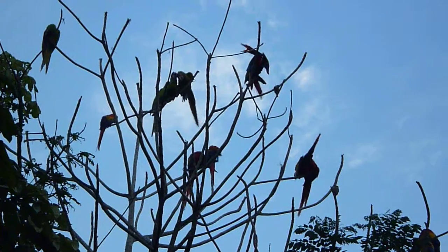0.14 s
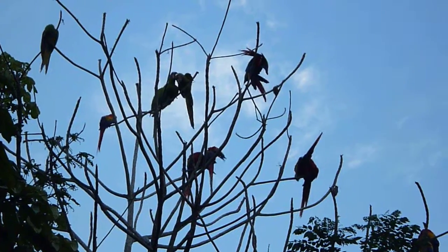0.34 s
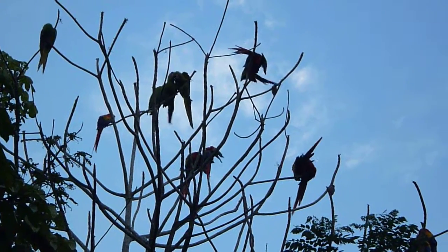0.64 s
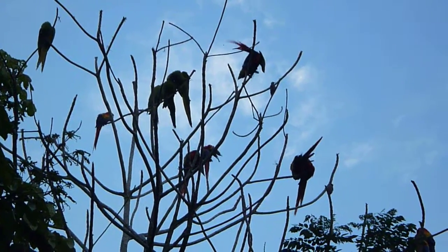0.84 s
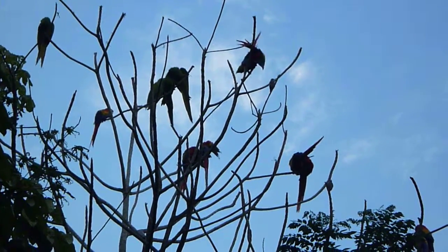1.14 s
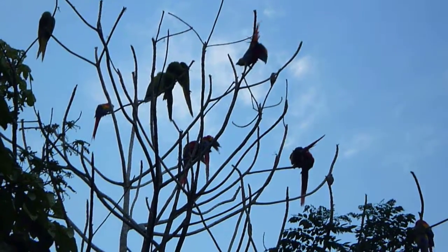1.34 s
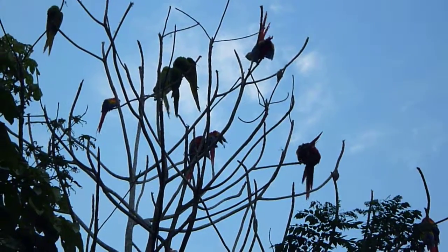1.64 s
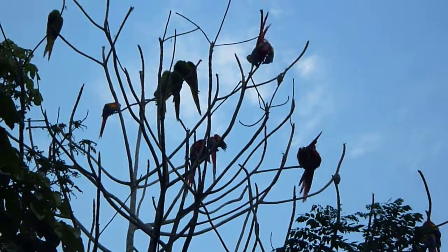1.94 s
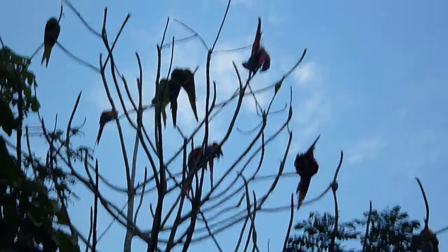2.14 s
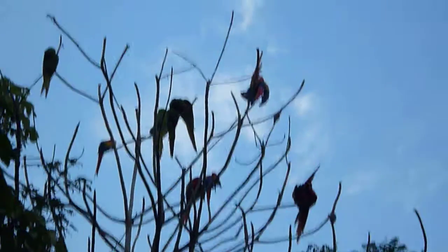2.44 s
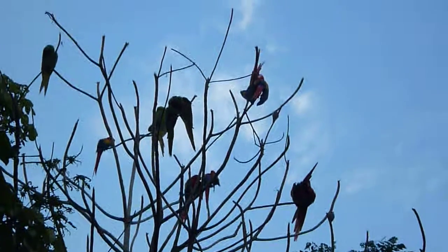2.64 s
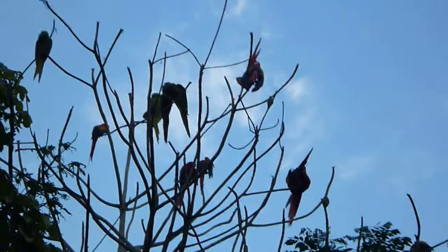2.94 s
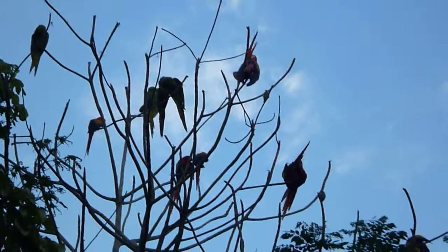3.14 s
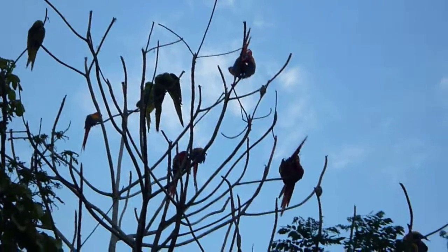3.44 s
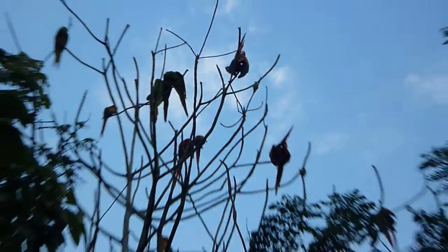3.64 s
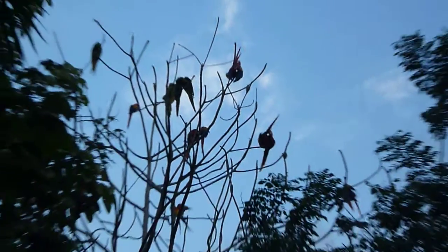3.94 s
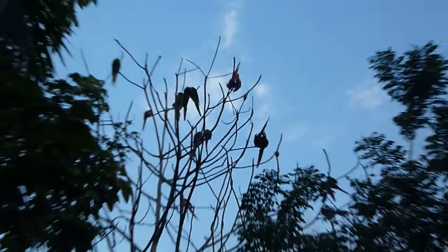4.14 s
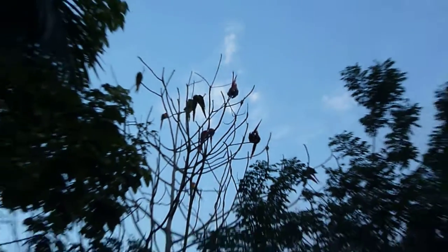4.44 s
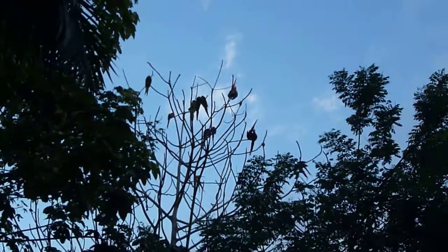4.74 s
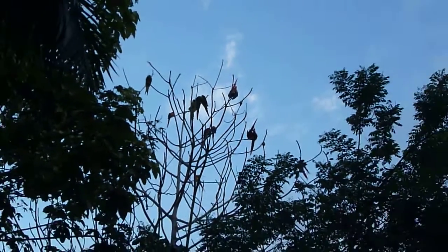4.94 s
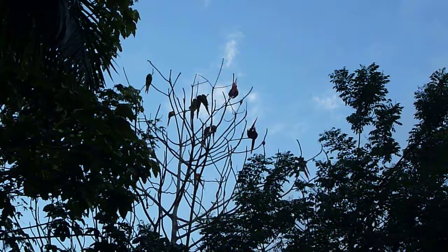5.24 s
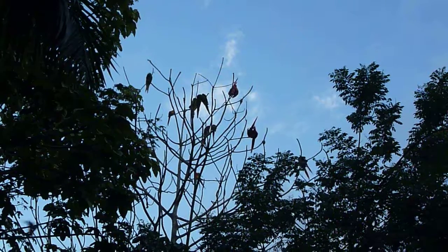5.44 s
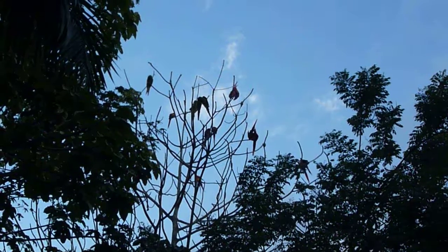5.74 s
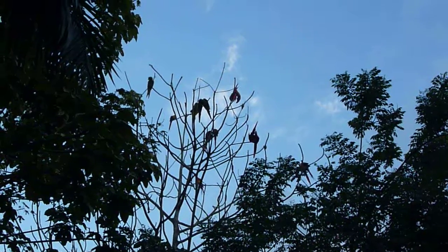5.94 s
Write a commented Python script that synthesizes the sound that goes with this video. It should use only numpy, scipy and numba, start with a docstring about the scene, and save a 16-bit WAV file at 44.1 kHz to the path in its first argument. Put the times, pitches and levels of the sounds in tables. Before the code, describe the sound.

Large parrots squawk harshly in forest trees, with whistles, chirps, faint insects and a few close camera creaks.

```python
"""A harsh macaw squawk opens the scene, and more follow from a bare tree at the edge of a forest.
Each is a rough buzz from the syrinx, shaped by throat, tongue and beak. Whistles and chirps slip in
between, and the trees echo the calls over a shimmer of insects and a soft rush of air. Up close, a
hand-held camera is bumped and rubbed, its zoom motor whines for a second, and its plastic shell
creaks, loudest near the end."""
import sys
import numpy as np
from scipy import signal
from scipy.fft import rfft, irfft
from scipy.io import wavfile
from scipy.ndimage import uniform_filter1d
from numba import njit

SR = 44100
rng = np.random.default_rng(int(sys.argv[2]) if len(sys.argv) > 2 else 0)


def store_pcm(level_fs):
    """Save levels as 16-bit WAV."""
    pcm = np.round(np.clip(level_fs, -1, 1) * 32767).astype(np.int16)
    wavfile.write(sys.argv[1], SR, np.atleast_2d(pcm).T)


N = 268128
TIME = np.arange(N) / SR

# Throat and beak resonances, by tone of voice. Each row: centre in Hz, width in Hz, gain in dB.
THROAT_FORMANTS = {"bright": [(1410, 320, 0.5), (2060, 470, -1.5), (2590, 370, -2), (3050, 350, -2),
                   (4100, 860, -5.5)], "hollow": [(1150, 240, -5), (1790, 350, -4), (2440, 450, -5.5),
                   (3170, 450, -4), (4350, 820, -5.5)], "shrill": [(1250, 510, -4.5), (1830, 400, -2),
                   (2310, 240, -1), (2980, 340, -1), (4330, 2100, -9.5)], "nasal": [(1010, 300, -8.5),
                   (1490, 400, -5.5), (1929, 570, -1.5), (2890, 470, -3.5), (4330, 330, -3)],
                   "deep": [(1180, 300, -2.5), (1710, 380, -2.5), (2760, 730, -3), (3580, 430, -2.5),
                   (4160, 680, -4.5)]}
# The macaws' calls. Each row: tone of voice, start and let-go in seconds, attack and release in seconds,
# relative level in dB, pitch in Hz, sag at let-go as a share of pitch, roughness from 0 to 1,
# first and last tongue resonance in Hz, treble share with the beak open in dB.
MACAW_CALLS = [("bright", 0.22, 0.46, 0.18, 0.082, -41, 377, 0, 0.6, 1400, 2570, -1.5),
               ("hollow", 0.75, 1.05, 0.22, 0.072, -39.5, 378, 0.02, 0.55, 2160, 2050, -2.5),
               ("hollow", 1.09, 1.225, 0.06, 0.032, -46.5, 385, 0.06, 0.2, 1800, 1800, -3.5),
               ("shrill", 2.06, 2.335, 0.05, 0.063, -38, 485, 0.12, 0.483, 2600, 2000, -1.6),
               ("shrill", 2.33, 2.55, 0.0697, 0.057, -44.5, 405, 0.0404, 0.85, 1540, 1620, -3.5),
               ("hollow", 2.7, 2.93, 0.101, 0.07, -54.5, 350, 0.04, 0.704, 1100, 1200, -10),
               ("nasal", 4.08, 4.195, 0.0906, 0.055, -44.5, 488, 0.03, 0.22, 1550, 1700, -1.1),
               ("deep", 4.72, 4.8, 0.04, 0.09, -54, 370, 0.032, 0.7, 1900, 2200, -10),
               ("deep", 5.07, 5.26, 0.12, 0.23, -44.5, 361, 0.003, 0.505, 1640, 1700, -2.8),
               ("deep", 5.38, 5.62, 0.16, 0.1, -37, 337, 0.04, 0.835, 1600, 2040, -2.5)]
def squawks(scoop=.04, sag_curve=3, edge_roughness=.95, beak_shut_db=-8):
    """The beak opens and the voice rises and firms up, then sags and turns rough as the bird lets go."""
    out = np.zeros(N)
    for tone, start, end, attack, release, db, hz, sag, rough, *tongue_ends, open_db in MACAW_CALLS:
        first = int(np.clip(start * SR, 0, N - SR))
        on = slice(first, first + SR)  # the second that holds the squawk
        age = np.maximum(TIME[on] - start, 0)
        opening = np.minimum(age / attack, 1)
        effort = opening * np.exp(-np.maximum(TIME[on] - end, 0) / release)
        spent = np.minimum(age / (end - start), 1.15)
        pitch = hz * (1 - scoop * (1 - opening) - sag * spent ** sag_curve)
        rasp = syrinx(pitch, rough * effort + edge_roughness * (1 - effort))
        tongue_hz = np.interp(TIME[on], [start, end + release], tongue_ends)
        treble_db = open_db + beak_shut_db * (1 - opening)
        out[on] += from_db(db) * effort * mouth(rasp, THROAT_FORMANTS[tone], tongue_hz, treble_db)
    return out


def syrinx(pitch, rough, jitter=.08, wobble=.028, turbulence=2.4, rasp_db=1.5, rasp_hz=110):
    """A buzz whose cycles turn uneven, then break up into chaos as its roughness grows."""
    n, rough = len(pitch), np.clip(rough, 0, 1)
    shake = jitter * wander(168.2, n) + wobble * wander(45.2, n)
    phase = phase_of(pitch * (1 + rough * shake))
    buzz = rms_one(sum(np.cos(k * phase) * 6 / max(k, 6) for k in range(2, 14)))
    chaos = rms_one(rng.standard_normal(n) * (1 + .092 * np.cos(phase)))
    flutter = from_db(rasp_db * np.sqrt(rough) * wander(rasp_hz, n))
    return (buzz + turbulence * rough ** 1.5 * chaos) * flutter


def mouth(rasp, formants, tongue_hz, treble_db, beak_hz=2700, tongue_width_hz=600):
    """The rasp rings in the throat, the tongue lifts a moving band, a wider beak lets out more treble."""
    rasp = rasp + moving_resonance(rasp, tongue_hz, tongue_width_hz)
    rasp = cut(cut(rasp, 750, "high", order=3), 4900, "low", order=3)
    voice = sum((-1) ** k * from_db(db) * resonate(rasp, hz, width)
                for k, (hz, width, db) in enumerate(formants))
    body = hold_level(cut(voice, beak_hz, "low", order=3))
    bite = hold_level(cut(voice, beak_hz, "high", order=3))
    treble = np.clip(from_db(treble_db), 0, .9)
    return np.sqrt(1 - treble ** 2) * body + treble * bite


# The curve of the loud, falling whistle. Each row: time in seconds, pitch in Hz, level in dB.
WHISTLE_CURVE = [(1.565, 2012, -51.5), (1.585, 2116, -42), (1.681, 2072, -39.5), (1.733, 1875, -31.5),
                 (1.763, 1545, -39), (1.775, 1620, -77)]
def whistle(second_db=-42, third_db=-28):
    """A bird slurs a nearly pure tone with two faint overtones."""
    times, hz, db = np.transpose(WHISTLE_CURVE)
    phase = phase_of(np.interp(TIME, times, hz) * (1 + .002 * wander(80)))
    tone = np.sin(phase) + from_db(second_db) * np.sin(2 * phase) + from_db(third_db) * np.sin(3 * phase)
    envelope = from_db(np.interp(TIME, times, db)) * gate(times[0], times[-1], .004, .004)
    return np.sqrt(2) * envelope * tone


# Small chirps around the tree, and clear overtones ringing out of the squawks. Each row: start and
# length in seconds, first and last pitch in Hz, level in dB, roughness (0 is pure, about 1 is hoarse).
CHIRPS_AND_OVERTONES = [(0.56, 0.042, 815, 813, -51.5, 0.1), (0.64, 0.057, 819, 802, -52.5, 0.2),
                        (0.983, 0.08, 2230, 1880, -46.5, 0.02), (1.18, 0.06, 1883, 1800, -52, 0.12),
                        (1.236, 0.28, 2595, 3210, -59, 0.1), (1.52, 0.28, 3560, 3565, -57, 0.91),
                        (1.56, 0.16, 1304, 1385, -52, 1.05), (1.948, 0.05, 2010, 1953, -50.5, 0.2),
                        (1.95, 0.14, 1447, 1567, -53, 0.57), (1.981, 0.055, 3420, 3200, -52, 0.5),
                        (2.33, 0.061, 1279, 1162, -49, 0.5), (3.01, 0.17, 3520, 2617, -58, 0.55),
                        (3.0, 0.26, 2230, 2080, -61.5, 0.12), (3.713, 0.076, 2240, 2470, -61.5, 0.3),
                        (4.009, 0.13, 1374, 1600, -57, 0.14), (4.168, 0.045, 1922, 1390, -49, 0.17),
                        (4.73, 0.065, 2715, 2930, -47.5, 0.57), (5.031, 0.29, 2626, 3020, -56, 0.02),
                        (5.108, 0.15, 1793, 1775, -47.5, 0.23), (5.88, 0.21, 1414, 1400, -61.5, 0.32),
                        (5.984, 0.097, 2136, 2110, -56, 0.14)]
def chirps(arch_share=.015, jitter=.08, flutter_db=4.0):
    """Each chirp or overtone glides in a shallow arch, swelling and fading; hoarse ones shake in pitch."""
    out, shake = np.zeros(N), wander(200)
    flutter = rms_one(from_db(flutter_db * wander(60)))
    for start, length, first_hz, last_hz, db, rough in list(CHIRPS_AND_OVERTONES) + far_chirps():
        on = (TIME > start) & (TIME < start + length)
        progress = (TIME[on] - start) / length
        arch = np.sin(np.pi * progress)
        pitch = (first_hz + (last_hz - first_hz) * progress) * (1 + arch_share * arch)
        phase = phase_of(pitch * (1 + jitter * rough * shake[on]))
        out[on] += from_db(db) * np.sqrt(2 * arch) * np.sin(phase)
    return out * flutter


# The distant flock's chirp. One row: length in seconds, lowest and highest starting pitch in Hz,
# widest glide as a share of pitch, level in dB, roughness.
FAR_CHIRP = (0.4, 1300, 2501, 0.07, -67, 0.2)
def far_chirps(count=12):
    """Chirp rows for the distant flock, at random times and pitches, gliding up or down."""
    length, low_hz, high_hz, glide, db, rough = FAR_CHIRP
    when, height, slope = rng.random((count, 3)).T
    starts = (np.arange(count) + when) / count * N / SR
    first_hz = low_hz + (high_hz - low_hz) * height
    last_hz = first_hz * (1 + glide * (2 * slope - 1))
    return [(s, length, first, last, db, rough) for s, first, last in zip(starts, first_hz, last_hz)]


# The ring of the camera's shell. Each row: pitch in Hz, relative level in dB, 60 dB decay in seconds.
SHELL_MODES = [(2625, -13.5, 0.01), (3355, -8, 0.0091), (3850, -1, 0.0024), (5160, -2, 0.0035),
               (5530, -4, 0.0065), (6880, 8, 0.0014)]
# Slips of the shell. Each row: time in seconds, relative strength in dB.
SHELL_SLIPS = [(1.197, -28.5), (1.2307, -25), (1.265, -29), (1.902, -20), (3.245, -37), (5.257, -29),
               (5.265, -35), (5.6837, -10.5), (5.696, -6.5), (5.699, -5), (5.7188, -10.5), (5.7207, -13.5),
               (5.7236, -15), (5.7364, -19), (5.745, -11.5), (5.7532, -10), (5.763, -9.5), (5.7686, -13.5),
               (5.79, -22)]
def creaks(tick_db=-6, knock_db=-11, knock_growth=1.06, settle_s=.007, settle_db=-13.5, spread_db=2.5):
    """The plastic slips in sharp ticks, each with a weaker one as it settles; hard slips also knock."""
    times, db = np.transpose(SHELL_SLIPS)
    settle_times = times + settle_s * (.5 + rng.random(len(times)))
    times, db = np.append(times, settle_times), np.append(db, db + settle_db)
    colour_db = spread_db * rng.standard_normal((len(times), len(SHELL_MODES)))
    ticks = sum((-1) ** k * ring(clicks_at(times, db + mode_db + colour_db[:, k]), hz, t60)
                for k, (hz, mode_db, t60) in enumerate(SHELL_MODES))
    knocks = ring(clicks_at(times, knock_growth * db), hz=860, t60=.0033)
    return from_db(tick_db) * cut(ticks, 280, "high") + from_db(knock_db) * cut(knocks, 220, "high")


# A hand bump, then the zoom's thuds as it starts and stops.
# Each row: time in seconds, relative strength in dB.
CAMERA_THUDS = [(1.952, -16.5), (1.999, -31), (3.451, -30), (4.6479, -16.5), (4.667, -23)]
# Rubs of fingers and zoom lever. Each row: middle and half length in seconds, level in dB.
CAMERA_RUBS = [(1.254, 0.045, -49), (1.917, 0.067, -48.5), (2.534, 0.023, -46.5), (2.617, 0.0082, -47.5),
               (2.827, 0.0037, -46), (4.42, 0.023, -51), (4.517, 0.013, -54), (4.583, 0.0039, -47),
               (4.6503, 0.0029, -29.5), (4.667, 0.0038, -26.5), (4.6824, 0.00094, -33.5)]
def handling():
    """The camera body thuds when it is jolted and hisses where it is rubbed."""
    jolts = clicks_at(*np.transpose(CAMERA_THUDS))
    thuds = ring(jolts, hz=263, t60=.0044) + 1.48 * ring(jolts, hz=300, t60=.0021)
    pressure = sum(from_db(db) * swell(middle, half) for middle, half, db in CAMERA_RUBS)
    friction = rng.standard_normal(N)
    hiss = rms_one(resonate(friction, hz=3940, width=2800) + .015 * cut(friction, 1900, "low"))
    return cut(thuds, 123, "high") + pressure * hiss


ZOOM_START_S, ZOOM_END_S = 3.46, 4.64
def zoom_motor(hz=2840, db=-61.5, waver=.0194):
    """The lens gears give a thin, unsteady whine."""
    whine = np.sin(phase_of(hz * (1 + waver * wander(180))))
    return from_db(db) * gate(ZOOM_START_S, ZOOM_END_S, .0098, .01) * whine


def forest_echo(calls, t60=.79, leaves_hz=4000, density=.08, predelay_s=.012):
    """Trunks and crowns throw back many small, dull echoes."""
    t = TIME[:SR]
    scatter = rng.standard_normal(SR) * (rng.random(SR) < density) * (t > predelay_s)
    tail = cut(scatter * np.exp(-np.log(1000) * t / t60), leaves_hz, "low")
    passband_gain = np.sqrt(np.sum(tail ** 2) * SR / (2 * leaves_hz))
    return signal.fftconvolve(calls, tail / passband_gain)[:N]


# Surges of the insect chorus. Each row: middle and half length in seconds.
INSECT_SURGES = [(0.33, 0.13), (0.902, 0.2), (2.049, 0.3), (3.2, 0.089), (4.2, 0.22), (5.4, 0.25)]
def insects(rest_hz=6133, rest_db=-63.5, surge_hz=-240, surge_db=4.5, spread_hz=230):
    """Many stridulating insects merge into one narrow, shimmering band that drops in pitch as it swells."""
    vigour = sum(swell(middle, half) for middle, half in INSECT_SURGES)
    phase = phase_of(rest_hz + surge_hz * vigour)
    shimmer = wander(spread_hz) * np.cos(phase) + wander(spread_hz) * np.sin(phase)
    return from_db(rest_db + surge_db * vigour) * shimmer


# The colour of the forest air. Each row: frequency in Hz, relative noise density in dB.
AIR_SPECTRUM = [(25, -17.5), (45, -10.5), (65, -2), (80, -2), (97, -2), (130, -2.5), (300, -0.5), (700, -3),
                (1300, -5), (2000, -9.5), (2700, -7.5), (4000, -13), (7000, -15.5), (10000, -23)]
def air(level_db=-52):
    """A smooth rush of distant foliage."""
    hz, db = np.transpose(AIR_SPECTRUM)
    bin_hz = np.arange(N // 2 + 1) * SR / N
    colour = from_db(np.interp(np.log(bin_hz + 1), np.log(hz), db))
    rush = irfft(rfft(rng.standard_normal(N)) * colour, N)
    return from_db(level_db) * rms_one(rush)


def hum(start_s=2.05, end_s=2.87, fade_s=.15, hz=92, width_hz=20, db=-65.5):
    """A faint, unsteady low hum fades in and out once."""
    drone = rms_one(resonate(rng.standard_normal(N), hz, width_hz))
    return from_db(db) * gate(start_s, end_s, fade_s, fade_s) * drone


def from_db(db):
    """Decibels to gain."""
    return 10 ** (np.asarray(db) / 20)


def rms_one(x):
    """Scale to rms 1."""
    return x / np.sqrt(np.mean(x ** 2) + 1e-20)


def hold_level(x):
    """Ride the gain so the running rms stays at 1."""
    return x / np.sqrt(uniform_filter1d(x * x, size=2600) + 1e-12)


def gate(start, end, attack, release):
    """One between start and end, falling away exponentially outside."""
    fade = np.maximum(start - TIME, 0) / attack + np.maximum(TIME - end, 0) / release
    return np.exp(-np.minimum(fade, 40))


def swell(middle, half):
    """A bell-shaped rise and fall of height 1."""
    return np.exp(-np.minimum(((TIME - middle) / half) ** 2, 40))


def wander(hz, size=N):
    """Random motion up to a given rate, at rms 1."""
    return rms_one(cut(rng.standard_normal(size + SR // 10), hz, "low")[SR // 10:])


def phase_of(hz):
    """Phase of a moving frequency."""
    return 2 * np.pi * np.cumsum(hz) / SR


def clicks_at(times, db):
    """Single clicks at the given times and levels."""
    return np.bincount(np.round(times * SR).astype(int), from_db(db), N)[:N]


def cut(x, hz, kind, order=2):
    """Butterworth low-pass or high-pass."""
    return signal.sosfilt(signal.butter(order, hz, kind, fs=SR, output="sos"), x + 1e-18)


def ring(clicks, hz, t60):
    """A unit click sets a sine of height 1 ringing."""
    r, w = np.exp(-np.log(1000) / (t60 * SR)), 2 * np.pi * hz / SR
    return signal.lfilter([0, np.sin(w)], [1, -2 * r * np.cos(w), r * r], clicks + 1e-18)


def resonate(x, hz, width):
    """A resonance with gain 1 at its peak."""
    r, w = np.exp(-np.pi * width / SR), 2 * np.pi * hz / SR
    return signal.lfilter(np.array([1, 0, -1]) * (1 - r * r) / 2, [1, -2 * r * np.cos(w), r * r], x + 1e-18)


@njit
def moving_resonance(x, hz, width):
    """A swept resonance with gain 1 at its peak."""
    r, w = np.exp(-np.pi * width / SR), 2 * np.pi * hz / SR
    y = np.zeros(len(x))
    for i in range(2, len(x)):
        y[i] = (1 - r * r) / 2 * (x[i] - x[i - 2]) + 2 * r * np.cos(w[i]) * y[i - 1] - r * r * y[i - 2]
    return y


def scene(squawk_db=-1, squawk_send_db=-6, whistle_send_db=-15, chirp_send_db=-4):
    """Birds up in the tree with their echoes, the forest all round, the camera dry and close."""
    harsh, clear, faint = from_db(squawk_db) * squawks(), whistle(), chirps()
    send = (from_db(squawk_send_db) * harsh + from_db(whistle_send_db) * clear
            + from_db(chirp_send_db) * faint)
    birds = harsh + clear + faint + forest_echo(send)
    bed = air() + insects() + hum()
    camera = creaks() + handling() + zoom_motor()
    return (birds + bed + camera)[None]


# Dips in the camera's treble. Each row: centre in Hz, width in Hz.
TREBLE_NOTCHES = [(5420, 460), (8000, 3000)]
def record(dry, zoom_notch_hz=260, zoom_width_hz=110, rolloff_hz=7420, cutoff_hz=8900):
    """A small camera: a low notch while the zoom runs, two notches in the treble and a steep top cut."""
    zooming = gate(ZOOM_START_S, ZOOM_END_S, .005, .0032)
    sound = dry - zooming * resonate(dry, zoom_notch_hz, zoom_width_hz)
    for hz, width in TREBLE_NOTCHES:
        sound = signal.lfilter(*signal.iirnotch(hz, hz / width, fs=SR), sound)
    sound = cut(sound, rolloff_hz, "low", order=12)
    return signal.sosfilt(signal.ellip(8, .1, 70, cutoff_hz, fs=SR, output="sos"), sound)


dry = scene()
out = record(dry)
store_pcm(out)
```